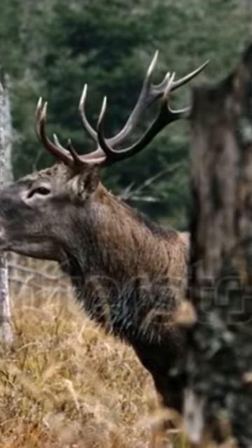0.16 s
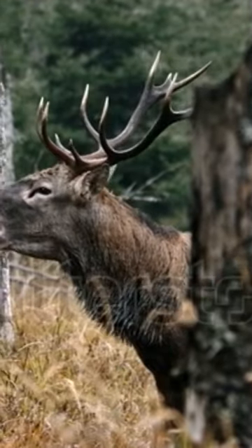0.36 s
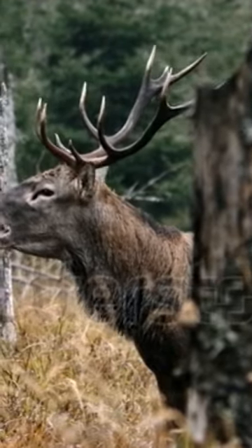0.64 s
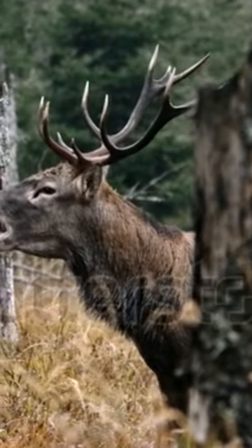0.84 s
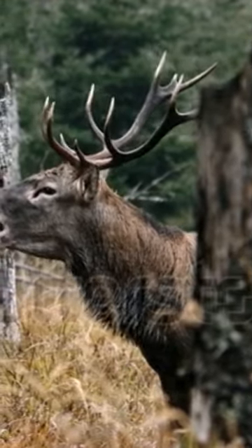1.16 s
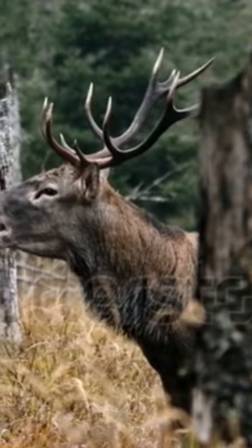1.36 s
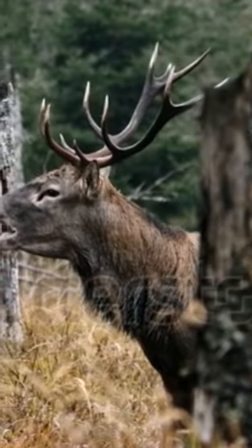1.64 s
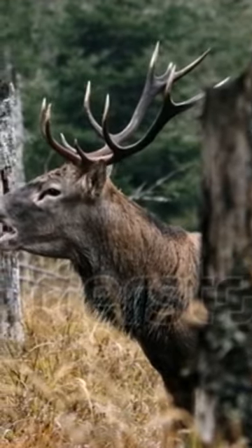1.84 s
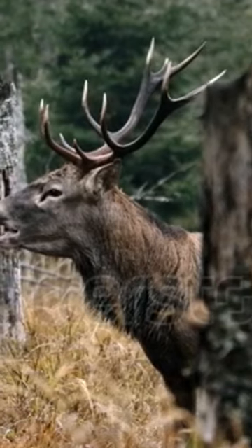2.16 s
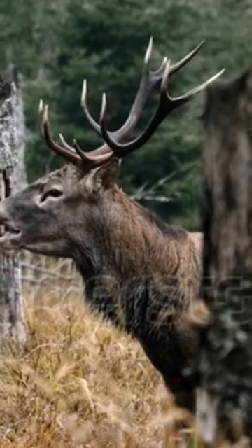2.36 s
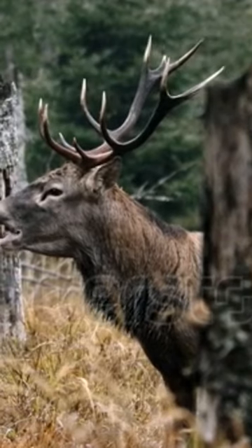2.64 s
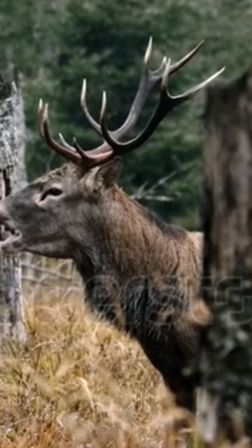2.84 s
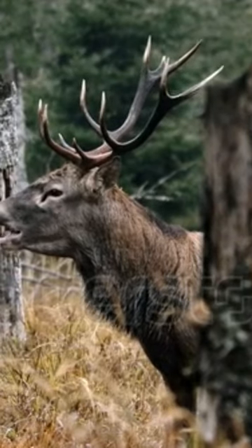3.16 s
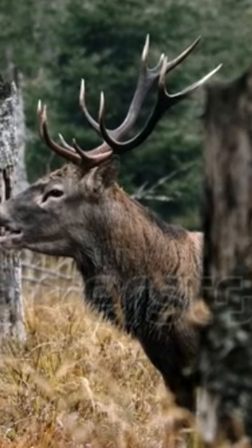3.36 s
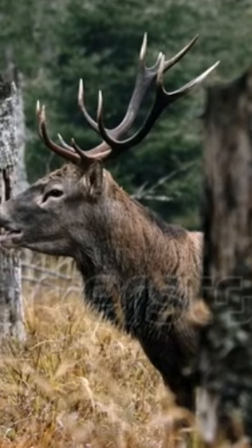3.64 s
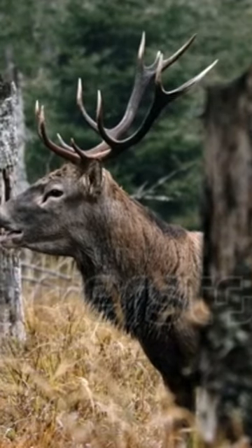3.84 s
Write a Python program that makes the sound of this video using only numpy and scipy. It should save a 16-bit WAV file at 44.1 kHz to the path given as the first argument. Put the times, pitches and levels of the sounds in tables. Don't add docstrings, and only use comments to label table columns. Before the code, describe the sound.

Red deer stag roars in slow throaty pulses, puffs, smacks its lips, and finally grunts.

```python
import sys
import numpy as np
from scipy import signal
from scipy.fft import rfft, irfft
from scipy.io import wavfile
from scipy.ndimage import uniform_filter1d

SR = 44100
rng = np.random.default_rng(int(sys.argv[2]) if len(sys.argv) > 2 else 0)


def volts(x):
    e = np.asarray(x, float) / 20
    return 10 ** e


def materialize(psi):
    bounded = np.clip(np.atleast_2d(psi).T, -1, 1)
    quanta = np.round(bounded * 32767).astype(np.int16)
    wavfile.write(sys.argv[1], SR, quanta)


N = 176400

# hz, level_db_per_hz
AIR = [(15, -12), (30, 1.5), (75, 2.5), (103, -14), (383, -14.5), (903, -27.5), (2560, -33.5), (2850, -36),
       (15000, -43.8)]
AIR_DB = -44
# hz, width_hz, level_db
FAR_BANDS = [(820, 115, -62), (1827, 44, -73), (2560, 130, -68.5), (3000, 90, -77)]

# time_s, slaps_per_s
ROAR_RATE = [(-.0205, 29.8), (.1, 30.62), (.165, 26.55), (.21, 29.54), (.29, 35.58), (.39, 39.76),
             (.48, 41.78), (.53, 37.57), (.6, 25.93)]
# time_s, effort_db, throat_pitch_factor, breath_share_db, tilt_db_per_octave
ROAR = [(0, 2, 1.075, -9, -.5), (.06, 1, 1.063, -7, 0), (.15, 0, 1.045, -9, 0), (.35, 2.5, 1.0, -10, 0),
        (.43, 1.5, .975, -10, 0), (.5, 1.5, .955, -9, -.2), (.57, -.5, .945, -6, -.6),
        (.61, -7, .945, -6, -.4)]
# hz, width_hz, level_db
ROAR_THROAT = [(186, 30, -22), (335, 35, -21),
               (440.8, 22, -6.5), (557.5, 29, -1), (922, 34, -12.5), (1066, 70, -19), (1274, 30, -10),
               (1514, 32, -10), (1924, 90, -7.5), (2290, 60, -14), (2660, 70, -13), (2890, 85, -13),
               (3260, 100, -16), (3560, 200, -20), (4150, 300, -20), (5146, 110, -23),
               (5600, 500, -35), (6500, 850, -41), (7600, 600, -40), (9200, 400, -50), (10400, 600, -56)]
# hz, width_hz, depth_db
LONG_DIPS = [(250, 77, -2.5), (776, 214, 1.5), (1687, 100, -28), (2520, 59, -19), (4680, 200, -16)]

# hz, t60_s
TREES = [(300, 1.52), (1000, 1.35), (3000, 0.92), (8000, 0.45)]
# hz, level_db
ECHO_COLOUR = [(300, 1), (550, -5), (900, 2), (1900, -4), (3000, -1), (8000, -3)]
TREES_DB, TRUNKS_DB = -24, -17

# time_s, level_db, throat_pitch_factor, sinking_resonance_hz
SIGH = [(.565, -42, .945, 500), (.585, -29, .95, 420), (.605, -28, .97, 360), (.625, -29, 1.04, 330),
        (.645, -32, 1.09, 300), (.665, -41, 1.12, 300), (.7, -52, 1.12, 300)]
# hz, width_hz, level_db
SIGH_THROAT = [(545, 60, 0), (930, 40, 0), (1270, 60, -12), (1500, 50, -8), (1930, 40, -5), (2660, 90, -17),
               (2950, 80, -14), (3900, 400, -25), (7400, 900, -36)]

# start_s, length_s, level_db, chest_thump_db, sag_db
PUFFS = [
    (.585, .05, -35, -30.5, -6),
    (1.384, 0.067, -37, -44, -3),
    (3.436, .07, -36.5, -38, -6),
]
# hz, width_hz, level_db
MOUTH = [(362, 110, -3), (696, 90, 1), (1096, 120, -4.5), (1544, 120, -7.5), (1755, 260, -5),
         (2150, 250, -9), (3450, 200, -21), (4320, 620, -24), (5300, 330, -27), (7460, 760, -29)]

# start_s, length_s, from_hz, to_hz, level_db
BIRD = (1.148, .04, 3250, 2350, -68)
# start_s, peak_db, low_hz, high_hz, t60_s
SMACKS = [
    (1.3848, -33, 1800, 2200, .035),
    (1.3852, -41, 1450, 3500, .03),
    (1.7538, -41, 1390, 2280, 0.019),
    (2.0863, -26.5, 1900, 3900, 0.0046),
]
# start_s, pitch_hz, peak_db, t60_s
KNOCK = (2.088, 64.5, -28, 0.07)

# time_s, pitch_hz, level_db
WHISTLE = [(3.065, 3600, -72), (3.09, 3900, -59), (3.103, 3300, -62), (3.116, 3900, -47),
           (3.124, 4400, -60), (3.14, 4540, -47), (3.16, 4520, -62), (3.19, 4520, -58), (3.22, 4500, -72)]
# centre_s, half_length_s, hz, width_hz, level_db
SNIFFS = [
    (3.1, .018, 4500, 1800, -58),
    (3.15, .035, 3200, 2200, -57),
    (3.17, .03, 360, 40, -54),
]

# time_s, slaps_per_s
GRUNT_RATE = [(3.2447, 33.4), (3.29, 35.91), (3.35, 25.05), (3.43, 14.63)]
# time_s, effort_db, throat_pitch_factor, breath_share_db, tilt_db_per_octave
GRUNT = [(3.24, -1, 0.99, -12, -.6), (3.28, 1.2, 0.985, -13, .2), (3.38, 0.5, 1.0, -12, 0),
         (3.44, 1.5, 0.92, -11, -.8)]
# hz, width_hz, level_db
SHORT_THROAT = [(379, 40, -4), (594, 30, 11), (720, 260, 0), (1090, 240, 5.5), (1500, 160, 1),
                (1790, 113, 6.5), (2070, 96, 0), (2250, 40, 2), (2390, 35, 3), (2900, 300, -9),
                (3300, 250, -4), (3800, 250, -11), (4350, 400, -8.5), (5300, 500, -25),
                (6200, 250, -27), (6850, 350, -27), (7900, 200, -30), (9300, 300, -48)]
# hz, width_hz, depth_db
SHORT_DIPS = [(170, 150, -24), (480, 90, -12), (555, 20, -8), (1370, 46, -15), (2560, 100, -5),
              (4800, 100, -5)]

# centre_s, length_s, above_hz, depth_db
DROPOUTS = [(.037, .014, 5000, -14), (.533, .01, 8000, -8), (.958, .014, 4500, -12),
            (1.106, .012, 4000, -9), (1.618, .016, 3500, -10), (1.982, .014, 3500, -9),
            (2.068, .018, 3300, -25), (2.183, .028, 3000, -7), (2.578, .014, 4500, -22),
            (2.685, .012, 4000, -7), (2.73, .018, 3000, -24), (3.066, .012, 4000, -9),
            (3.223, .013, 4800, -14), (3.45, .015, 5700, -20), (3.688, .014, 4000, -8),
            (3.773, .014, 4000, -15)]

STRETCH_FADE_HZ = 4000


def evened(x):
    return x / np.sqrt(np.mean(x ** 2) + 1e-20)


def read(points, hz):
    f, value = np.transpose(points)
    return np.interp(np.log(hz + 1), np.log(f + 1), value)


def add(mix, start_s, sound):
    part = mix[round(start_s * SR):][:len(sound)]
    part += sound[:len(part)]


def resonate(x, hz, width_hz):
    turn = np.exp(2j * np.pi * np.cumsum(hz * np.ones(len(x))) / SR)
    r = np.exp(-np.pi * width_hz / SR)
    return 2 * (turn * signal.lfilter([1 - r], [1, -r], x / turn)).imag


def tract(x, peaks):
    return sum((-1) ** k * volts(db) * resonate(x, hz, width) for k, (hz, width, db) in enumerate(peaks))


def air():
    frames, hz = N // 512 + 5, np.fft.rfftfreq(2048, 1 / SR)
    a, b, patches = rng.standard_normal((frames, 1025, 3)).T
    patches = uniform_filter1d(patches, 16, 0)
    patches = evened(uniform_filter1d(patches, 8, 1))
    z = (a + 1j * b) * volts(read(AIR, hz)[:, None] + 0.9 * patches)
    wash = signal.istft(z, nperseg=2048, noverlap=1536)[1][:N]
    mix = volts(AIR_DB) * evened(wash)
    for band_hz, width_hz, db in FAR_BANDS:
        mix += volts(db) * evened(resonate(rng.standard_normal(N), band_hz, width_hz))
    return mix


def slap(breath_db, soft_hz):
    spray_s, spray_db, flutter_s = .007, -1, .021
    t = np.arange(2500) / SR
    a, b = rng.standard_normal((2, len(t)))

    def burst(noise, decay_s):
        decay = np.exp(-t / decay_s)
        return noise * decay / np.linalg.norm(decay)

    click = signal.lfilter(*signal.butter(2, soft_hz, fs=SR), -signal.unit_impulse(len(t)))
    spray = signal.lfilter(*signal.butter(2, soft_hz, "high", fs=SR), burst(a, spray_s))
    return click + volts(spray_db) * spray + volts(breath_db) * burst(b, flutter_s)


def ring(peaks, dips, stretch, lag_s, lead_s, size=16384):
    skirt, roll_hz, lead_hz = 1.3, 10300, 800
    hz = np.fft.rfftfreq(size, 1 / SR)

    def bell(f, width_hz):
        centre_hz = f * stretch ** np.exp(-f / STRETCH_FADE_HZ)
        return 1 / (1 + (2 * (hz - centre_hz) / width_hz) ** 2)

    power = sum(volts(db) ** 2 * bell(f, width) ** skirt for f, width, db in peaks)
    gain = np.sqrt(power / (1 + (hz / roll_hz) ** 16))
    for f, width, db in dips:
        gain = gain * volts(db * bell(f, width))
    folded = irfft(np.log(gain + 1e-6))[:size // 2]
    folded[1:] *= 2
    held = 2j * np.pi * lead_s * (hz - lead_hz * (1 - np.exp(-hz / lead_hz)))
    lag = 1j * np.pi * lag_s * hz ** 2 / 1000
    return irfft(np.exp(rfft(folded, size) - held - lag))[:size // 2]


def call(rate, control, throat, dips, peak_db, lag_s, soft_hz, lead_s, count):
    wobble_share, wobble_db, slap_spread_db = .003, .8, 1.1
    start = rate[0][0]
    when, *curves = np.transpose(control)
    t = np.arange(SR) / SR
    cycles = np.cumsum(np.interp(start + t, *np.transpose(rate))) / SR
    slaps_s = np.searchsorted(cycles, np.arange(count)) / SR
    voice = np.zeros(SR)
    for s in slaps_s:
        effort_db, stretch, breath_db, tilt_db = [np.interp(start + s, when, c) for c in curves]
        drive = slap(breath_db, soft_hz)
        chance = rng.standard_normal((len(throat), 2))
        now = []
        for (hz, width, db), (p, q) in zip(throat, chance):
            level_db = db + wobble_db * q + tilt_db * np.log2(hz / 600)
            now.append((hz * (1 + wobble_share * p), width, level_db))
        size = volts(effort_db + slap_spread_db * rng.uniform(-0.56, 1))
        add(voice, s, size * signal.fftconvolve(drive, ring(now, dips, stretch, lag_s, lead_s)))
    start = start - .9 * lead_s
    early = max(round(-start * SR), 0)
    return max(start, 0), volts(peak_db) * voice[early:] / abs(voice).max()


def trunks(x):
    t = np.arange(SR // 4) / SR
    tail = rng.standard_normal(len(t)) * np.minimum(t / .008, 1) * volts(-60 * t / .12)
    return signal.fftconvolve(x, tail / np.linalg.norm(tail))[:N]


def trees(x):
    taps = np.zeros(SR)
    at = np.arange(1200, SR - 20, 20)
    taps[at + rng.integers(0, 20, len(at))] = rng.choice([-1., 1.], len(at))
    hz, t, z = signal.stft(taps, SR, nperseg=256)
    decay_db = -60 * t / read(TREES, hz)[:, None]
    tail = signal.istft(z * volts(decay_db + read(ECHO_COLOUR, hz)[:, None]), SR, nperseg=256)[1]
    return signal.fftconvolve(x, tail / np.linalg.norm(tail))[:N]


def sigh():
    when, db, stretch, sink_hz = np.transpose(SIGH)
    t = np.arange(when[0], when[-1], 1 / SR)
    a, b = rng.standard_normal((2, SR // 4))[:, :len(t)]
    factor = np.interp(t, when, stretch)
    moved = [(hz * factor ** np.exp(-hz / STRETCH_FADE_HZ), width, level)
             for hz, width, level in SIGH_THROAT]
    sink = evened(resonate(b, np.interp(t, when, sink_hz), 90))
    sink = sink * volts(1 - 400 * np.maximum(t - .615, 0))
    return when[0], volts(np.interp(t, when, db)) * (evened(tract(a, moved)) + sink)


def puff(start, length, db, thump_db, sag_db):
    rise_s, air_t60_s, treble_t60_s, treble_hz = 0.0016, 0.15, .32, 3000
    thump_hz, thump_width_hz, thump_t60_s = 221, 246, 0.17
    t = np.arange(SR // 2) / SR
    a, b, c = rng.standard_normal((3, len(t)))
    lumps = volts(2.2 * evened(uniform_filter1d(c, 300)))
    low = evened(tract(a, [row for row in MOUTH if row[0] <= treble_hz]))
    top = sum(tract(a, [row]) for row in MOUTH if row[0] > treble_hz)
    top = top * volts(4 - 60 * t / treble_t60_s)
    level_db = db + sag_db * np.minimum(t / length, 1) - 60 * np.maximum(t - length, 0) / air_t60_s
    breath = lumps * evened(low + top) * volts(level_db)
    chest = resonate(resonate(b, thump_hz, thump_width_hz), thump_hz, thump_width_hz)
    thump = evened(chest) * volts(thump_db - 60 * np.maximum(t - .025, 0) / thump_t60_s)
    return start, np.minimum(t / rise_s, 1) * (breath + thump)


def bird(start, length, from_hz, to_hz, db):
    u = np.linspace(0, 1, round(length * SR))
    phase = 2 * np.pi * np.cumsum(from_hz + (to_hz - from_hz) * u) / SR
    return start, volts(db) * np.sin(np.pi * u) * np.sin(phase)


def smack(start, db, low_hz, high_hz, t60_s):
    t = np.arange(2000) / SR
    rings = np.sin(2 * np.pi * low_hz * t) - .9 * np.sin(2 * np.pi * high_hz * t)
    tick = 0.25 * np.exp(-t / .003) * np.sin(2 * np.pi * 2.3 * high_hz * t)
    return start, (rings + tick) * np.minimum(t / 0.00034, 1) * volts(db - 60 * t / t60_s)


def knock(start, hz, db, t60_s):
    t = np.arange(SR // 4) / SR
    return start, np.sin(2 * np.pi * hz * t) * volts(db - 60 * t / t60_s)


def whistle():
    when, hz, db = np.transpose(WHISTLE)
    t = np.arange(when[0], when[-1], 1 / SR)
    pitch_hz = np.interp(t, when, hz)
    tone = np.sqrt(2) * np.sin(2 * np.pi * np.cumsum(pitch_hz) / SR)
    fuzz = .6 * evened(resonate(rng.standard_normal(SR)[:len(t)], pitch_hz, 90))
    return when[0], (tone + fuzz) * volts(np.interp(t, when, db))


def sniff(centre_s, half_s, hz, width_hz, db):
    t = np.arange(-SR // 10, SR // 10) / SR
    hiss = resonate(resonate(rng.standard_normal(len(t)), hz, width_hz), hz, width_hz)
    return centre_s + t[0], volts(db) * np.exp(-(t / half_s) ** 2 / 2) * evened(hiss)


def scene():
    stag, wind = np.zeros(N), air()
    add(stag, *call(ROAR_RATE, ROAR, ROAR_THROAT, LONG_DIPS,
                    peak_db=-5.6, lag_s=.0001, soft_hz=4800, lead_s=.0002, count=22))
    add(stag, *sigh())
    for row in PUFFS:
        add(stag, *puff(*row))
    add(wind, *bird(*BIRD))
    for row in SMACKS:
        add(stag, *smack(*row))
    add(wind, *knock(*KNOCK))
    add(stag, *whistle())
    for row in SNIFFS:
        add(stag, *sniff(*row))
    add(stag, *call(GRUNT_RATE, GRUNT, SHORT_THROAT, SHORT_DIPS,
                    peak_db=-9.3, lag_s=.0002, soft_hz=9000, lead_s=0, count=6))
    echo = volts(TREES_DB) * trees(stag) + volts(TRUNKS_DB) * trunks(stag)
    return (stag + echo + wind)[None]


def top_cut(x):
    return signal.sosfilt(signal.butter(12, 15770, fs=SR, output="sos"), x)


def record(dry):
    low_pass = signal.firwin(511, 15750, window=("kaiser", 9), fs=SR)
    cut = signal.oaconvolve(dry, low_pass[None], "same")
    hz, t, z = signal.stft(cut, SR, nperseg=256)
    for centre_s, length_s, above_hz, depth_db in DROPOUTS:
        depth = np.clip(2 * (1 - abs(t - centre_s) / (.75 * length_s)), 0, 1)
        z = z * volts(depth_db * (hz > above_hz)[:, None] * depth)
    mix = signal.istft(z, SR, nperseg=256)[1][:, :N]
    return top_cut(mix)


dry = scene()
out = record(dry)
materialize(out)
```